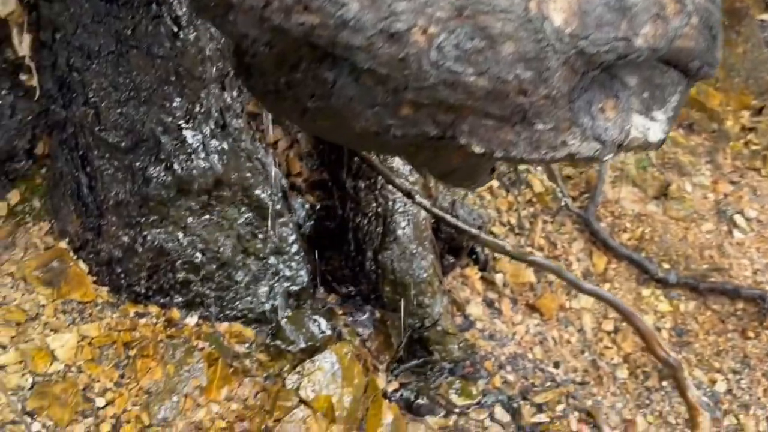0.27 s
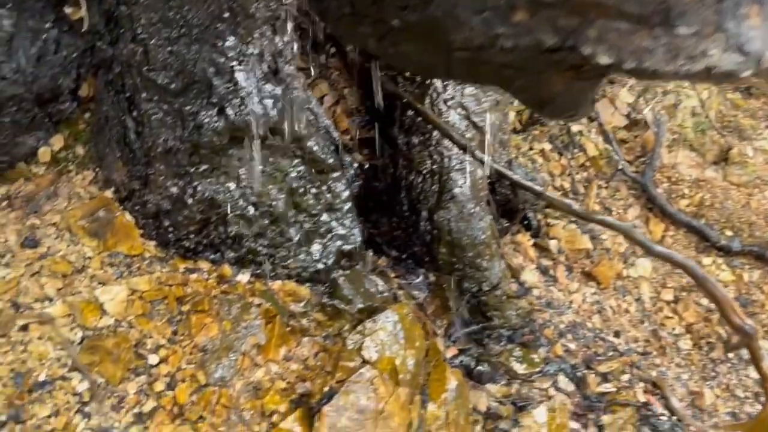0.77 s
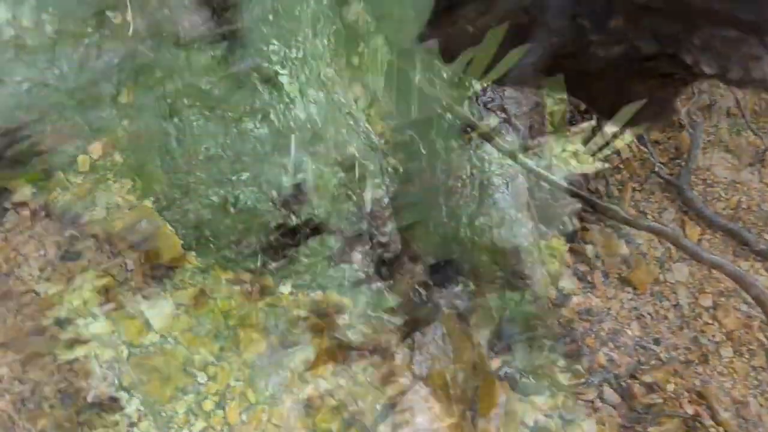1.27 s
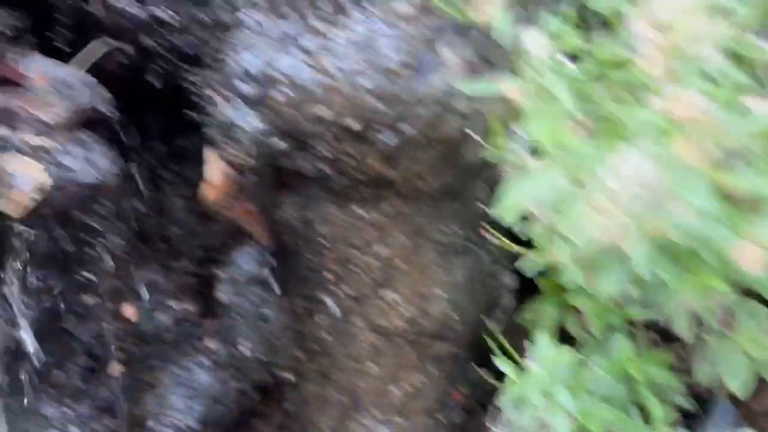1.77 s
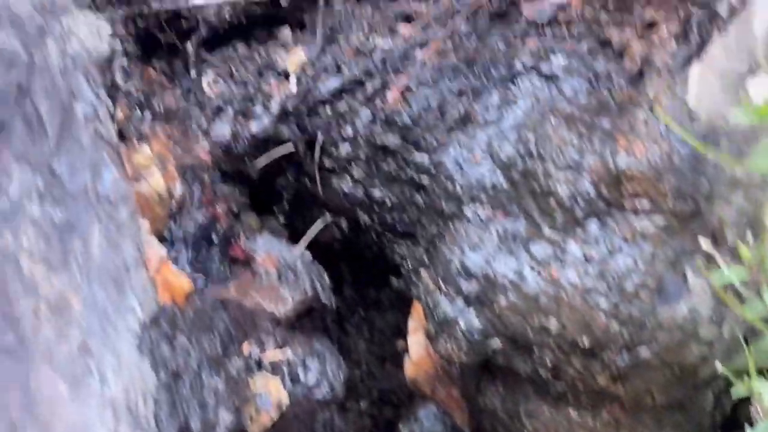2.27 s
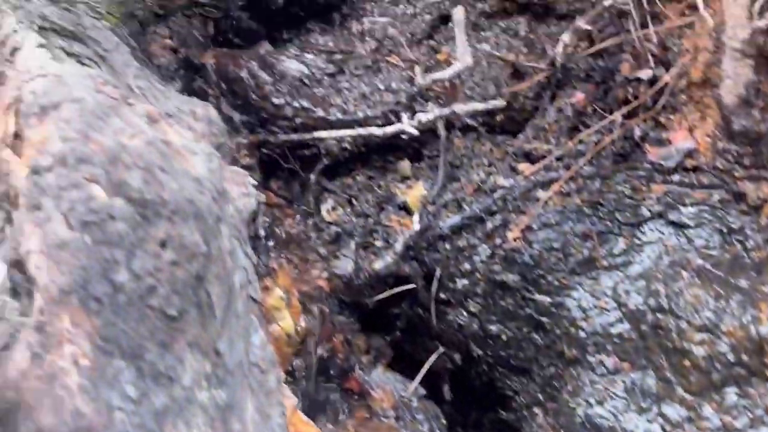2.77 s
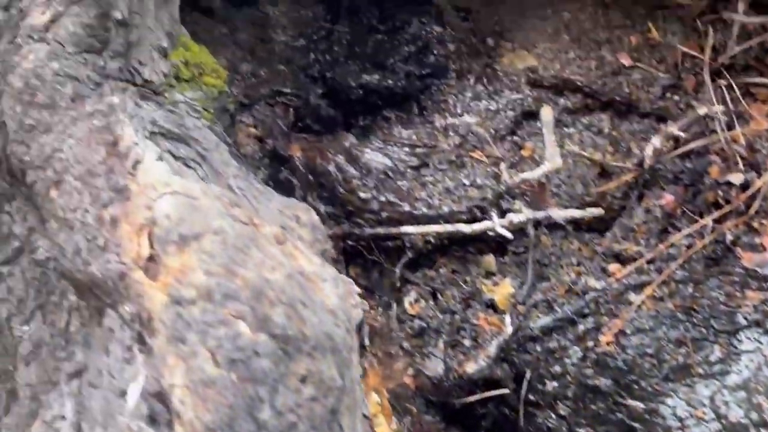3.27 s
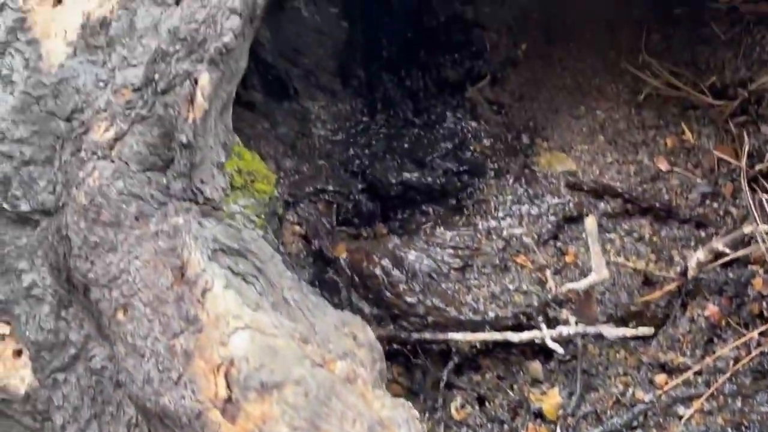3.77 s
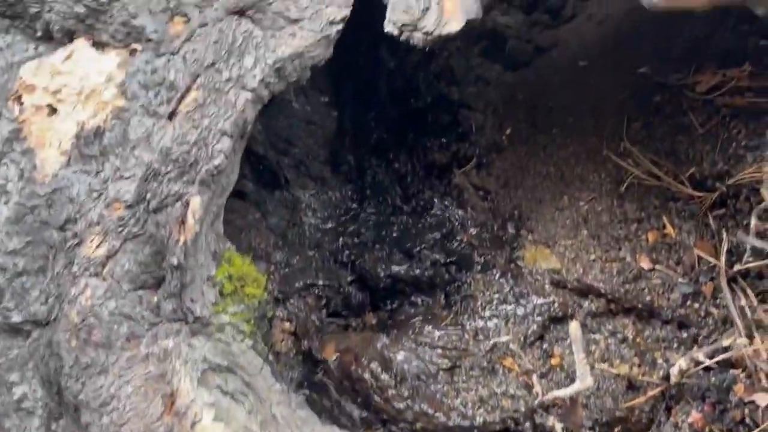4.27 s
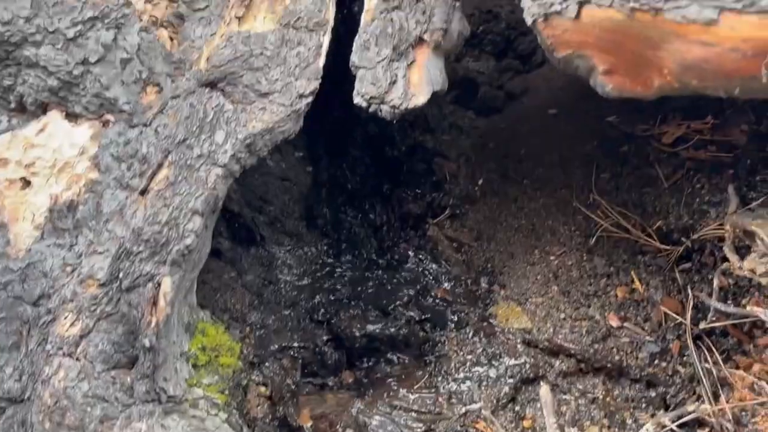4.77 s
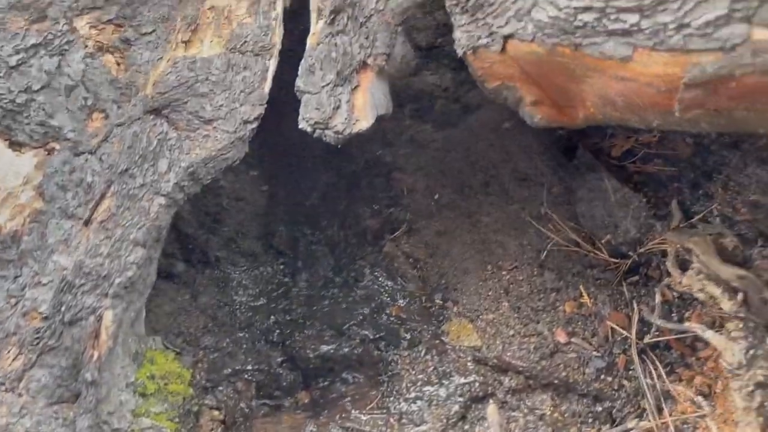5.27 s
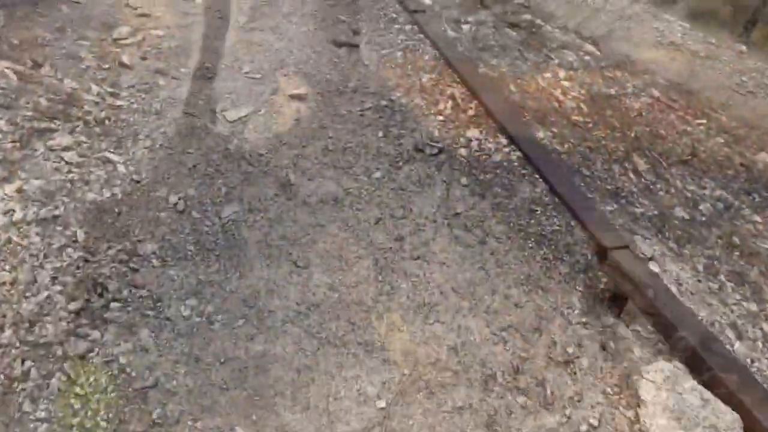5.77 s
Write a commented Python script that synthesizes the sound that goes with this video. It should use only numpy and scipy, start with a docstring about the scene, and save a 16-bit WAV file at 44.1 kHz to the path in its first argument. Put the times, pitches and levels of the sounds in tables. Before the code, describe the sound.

A thin trickle of water patters and plops irregularly on wet rock, with low breeze rumble and a few gravelly footsteps clicking.

```python
"""Trickle and drips beside a trail

A thin trickle seeps from under a boulder: a shower of tiny splats, bubbles and hiss that follows the flow.
Near drops plop as short filtered noise with a ringing bubble, or spit as treble noise on bare rock.
Boots scuff the gravel as swells of clicks and noise; heels and loose stones knock as damped resonances.
A light breeze rumbles in the hand-held microphone as lumpy low noise, and the rocks add a weak echo."""
import sys
import numpy as np
from scipy import signal
from scipy.fft import rfft, irfft
from scipy.io import wavfile

SR = 44100
rng = np.random.default_rng(int(sys.argv[2]) if len(sys.argv) > 2 else 0)


def wav_out(sig):
    """Save sig, one row per channel (or a flat mono array), as 16-bit PCM at SR to the path in sys.argv[1]."""
    wavfile.write(sys.argv[1], SR, np.round(np.clip(np.atleast_2d(sig).T, -1, 1) * 32767).astype(np.int16))


N = 265217  # samples, about 6 s

# Sounds are pairs: mid (middle) and side (left-right difference). Levels in tables and settings are
# relative: later gains shift them. t60_s is the time in which a plain fade falls by 60 dB.
HZ = np.fft.rfftfreq(N, 1 / SR)
TAPS = 4096  # length of one short sound, in samples
TAP_HZ, TAP_S = np.fft.rfftfreq(TAPS, 1 / SR), np.arange(TAPS) / SR
EDGE_HZ = 15900  # upper limit of the treble


def gain_of(db):
    """Turns decibels into amplitude."""
    return 10 ** (np.asarray(db) / 20)


def evened(x):
    """Scales a sound to an average strength (rms) of 1."""
    return x / np.sqrt(np.mean(x ** 2) + 1e-30)


def sized(sound):
    """Scales a short sound to the energy of 10 ms at rms 1."""
    return sound / np.linalg.norm(sound, axis=-1, keepdims=True) * np.sqrt(SR / 100)


def read(points, hz):
    """Joins a spectrum table by straight lines on a log-frequency axis."""
    f, value = np.transpose(points)
    return np.interp(np.log(hz + 1), np.log(f + 1), value)


def follow(curve):
    """Turns a level curve into a gain for every sample."""
    return gain_of(np.interp(np.arange(N) / SR, *np.transpose(curve)))


def coloured(x, spectrum):
    """Boosts and cuts frequencies by a spectrum table, then scales to rms 1."""
    return evened(irfft(rfft(x) * gain_of(read(spectrum, HZ)), N))


def add(mix, s, sound):
    """Adds a two-channel sound at time s, in seconds."""
    part = mix[:, max(round(s * SR), 0):][:, :sound.shape[1]]
    part += sound[:, :part.shape[1]]


def wander(per_s, size):
    """Random ups and downs of rms near 1: straight lines to a new value per_s times a second."""
    knots = rng.standard_normal(4096)
    # joining by lines weakens the swing, so 1.2 restores it
    return 1.2 * np.interp(np.arange(size) / SR * per_s, np.arange(len(knots)), knots)


def hump(f, hz, octaves):
    """Gain of a broad, heavily damped resonance around hz."""
    return (1 + (np.log2((f + 1) / hz) / octaves) ** 2 / 2) ** -1.5


def above(hz, f=TAP_HZ):
    """Gain of a gentle filter that lets through what lies above hz."""
    return 1 / np.sqrt(1 + (hz / (f + 1)) ** 4)


def ring(x, gain):
    """Filters a short sound so that it starts sharply and only rings afterwards (minimum phase)."""
    log_gain = np.log(np.maximum(gain, 1e-5))
    circle = np.concatenate([log_gain, log_gain[-2:0:-1]])
    response = np.exp(np.conj(signal.hilbert(circle)))[:len(gain)]
    return irfft(rfft(x) * response, TAPS)


def knock(hz, octaves):
    """A single click through a damped resonance."""
    return sized(ring(signal.unit_impulse(TAPS), hump(TAP_HZ, hz, octaves)))


# A full drop flattens in SLAP_S and fades in SPLASH_T60_S; a longer fade means a softer start.
SPLASH_T60_S, SLAP_S, SOFT_POWER, SOFTEST_S = 0.023, .0004, 1.6, .0014


def splat(gain, t60_s, scatter_db, lumps_per_s=500, lumps_db=4):
    """A drop flattens with a short slap of noise, then breaks up in a lumpy, fading scatter of noise."""
    t60_s = max(t60_s, 1e-3)
    flatten_s = min(SLAP_S * (t60_s / SPLASH_T60_S) ** SOFT_POWER, SOFTEST_S)
    slap, scatter = rng.standard_normal((2, 2, TAPS))
    slap = slap * TAP_S * np.exp(-TAP_S / flatten_s)
    fade = np.exp(-np.log(1000) * TAP_S / t60_s)
    onset = 1 - np.exp(-TAP_S / (2 * flatten_s))
    scatter = scatter * fade * gain_of(lumps_db * wander(lumps_per_s, TAPS)) * onset
    return sized(sized(ring(slap, gain)) + gain_of(scatter_db) * sized(ring(scatter, gain)))


def ping(hz, cycles, glide):
    """A bubble swells in about a cycle, fades by 60 dB over some cycles and rises in pitch."""
    age = TAP_S * hz / cycles
    turns = cycles * (age + glide * age ** 2)
    return np.sin(2 * np.pi * turns) * np.exp(-np.log(1000) * age) * (1 - np.exp(-turns))


def random_hits(per_s, spread_db):
    """Hits at random moments, many small and a few large."""
    size = gain_of(spread_db * np.minimum(rng.exponential(1, N), 2.5))
    return size * (rng.random(N) < per_s / SR)


def droplets(per_s, spread_db, low_hz, high_hz, octaves, t60_s, count):
    """A random shower of small splats of several pitches and many sizes."""
    out = np.zeros((2, N))
    for hz in np.geomspace(low_hz, high_hz, count):
        hits = random_hits(per_s / count, spread_db)
        drop = splat(hump(TAP_HZ, hz, octaves), t60_s, scatter_db=3.0)
        out += signal.oaconvolve(hits[None], drop, axes=1)[:, :N]
    return out


def bubbles(per_s=100, spread_db=5, low_hz=2300, high_hz=9500, cycles=36, glide=0.021, count=36):
    """A random swarm of tiny ringing bubbles of many pitches and sizes, at rms 1."""
    out = np.zeros((2, N))
    for hz in np.geomspace(low_hz, high_hz, count):
        hits = random_hits(per_s / count, spread_db)
        swarm = signal.oaconvolve(hits, ping(hz, cycles, glide) * np.sqrt(hz))[:N]
        out += np.outer([1, rng.normal()], swarm)  # each pitch has its own place left or right
    return evened(out)


# Strength of the trickle at the microphone: time_s, level_db
FLOW = [(0.0, -42.5), (.12, -47), (.17, -42.5), (0.25, -42.5), (0.37, -47.5), (0.8, -40), (1.22, -38),
        (1.52, -37.5), (2.31, -42), (2.44, -43), (3.03, -44), (3.13, -44), (3.46, -45), (3.88, -43.5),
        (4.59, -46), (5.1, -41), (5.46, -41.5), (5.72, -39.5), (5.89, -40), (6.01, -44)]
# Nearness of the little pool that throws spray and forms bubbles: time_s, level_db
POOL = [(0, 0), (4.6, 0), (5.05, -7), (6.01, -9)]
# Tone of the patter: pitch_hz, boost_db
PATTER_TONE = [(300, -39), (700, 8.5), (1200, -5.5), (1800, 0), (2250, -3.5), (2800, -1), (3500, 1.5),
               (4400, 8), (6000, 1.5), (8000, 9.5), (12500, 13), (15500, 15)]


def trickle(flow_db=-4.0, ticks_db=0.5, plips_db=-4, splashes_db=-11.0, fizz_db=-9, bubbles_db=-8,
            flutter_per_s=70, flutter_db=2.5):
    """Spray ticks, small plips, merging splashes, bubbles and a fizzing film follow the fluttering flow."""
    ticks = droplets(per_s=300, spread_db=6, low_hz=5500, high_hz=14000, octaves=.4, t60_s=.026, count=10)
    small = droplets(per_s=700, spread_db=5.5, low_hz=1120, high_hz=8200, octaves=.12, t60_s=.04, count=30)
    splashes = droplets(per_s=130, spread_db=4, low_hz=2000, high_hz=8000, octaves=.35, t60_s=.1, count=12)
    fizz = rng.standard_normal((2, N))
    film = gain_of(plips_db) * coloured(small, PATTER_TONE)
    film = film + gain_of(fizz_db) * coloured(fizz, PATTER_TONE)
    pool = gain_of(ticks_db) * coloured(ticks, PATTER_TONE)
    pool = pool + gain_of(splashes_db) * evened(splashes) + gain_of(bubbles_db) * bubbles()
    unrest_db = flutter_db * wander(flutter_per_s, N)
    return follow(FLOW) * gain_of(flow_db + unrest_db) * (film + follow(POOL) * pool)


def runnel(runnel_db=-12.5):
    """The water runs off over grit in a chatter of small, short-lived bubbles."""
    chatter = bubbles(per_s=320, spread_db=4.5, low_hz=1400, high_hz=6000, cycles=15, glide=.04, count=24)
    return gain_of(runnel_db) * follow(FLOW) * follow(POOL) * chatter


# Strength of the breeze: time_s, level_db
BREEZE = [(0, -52.5), (.55, -52.5), (.8, -46.5), (.97, -43), (1.15, -45), (1.38, -47), (1.55, -49.5),
          (1.8, -52.5), (2.2, -58.5), (2.5, -56.5), (4.05, -57.5), (4.7, -60), (5.25, -55), (5.55, -54.5),
          (5.85, -51)]
# Tone of the breeze in the microphone: pitch_hz, boost_db
WIND_TONE = [(20, -45), (33, -11), (48, -5), (64, 6), (80, 0.5), (100, -2.5), (150, -5), (215, -2.5),
             (260, -9), (330, -11), (550, -17), (1200, -17.5), (4000, -86)]
# Tone of the hillside: pitch_hz, boost_db
FOREST_TONE = [(22, -12), (50, 5), (100, -32), (350, 10), (600, -1.5), (1200, -6), (3000, -2), (8000, -25),
               (16000, -61)]


def air(wind_db=1, forest_db=-59, gusts_per_s=14, gusts_db=2.0):
    """A lumpy breeze, made of uneven noise, rumbles over the steady hush of the hillside."""
    eddies = rng.standard_normal((2, N)) * gain_of(gusts_db * wander(gusts_per_s, N))
    wind = gain_of(wind_db) * follow(BREEZE) * coloured(eddies, WIND_TONE)
    return wind + gain_of(forest_db) * coloured(rng.standard_normal((2, N)), FOREST_TONE)


# Strength of the gurgle in the cleft: time_s, level_db
CLEFT = [(1.5, -65), (2.1, -55), (3.6, -61), (4.6, -73), (5.5, -73)]


def cleft():
    """Bubbles gurgle in the hollow under the boulder, strongest as the microphone passes over it."""
    gurgle = bubbles(per_s=150, spread_db=7, low_hz=1550, high_hz=1950, cycles=36, glide=.015, count=10)
    return follow(CLEFT) * gurgle


RAGGED_OCTAVES = .5  # a plop narrower than this is a clean one


def plop(hz, octaves, t60_s, scatter_db=1.8, low_hz=800, bubble_gain=1.0, bubble_width_hz=200, detune=0.1):
    """A drop slaps a pocket of water and traps a bubble that rings briefly near the pocket's pitch."""
    bubble_hz = hz * 2 ** rng.normal(0, octaves * detune)
    clearness = min(RAGGED_OCTAVES / octaves, 1) ** 2
    bubble = 1 + bubble_gain * clearness * hump(TAP_HZ, bubble_hz, bubble_width_hz / hz)
    return splat(hump(TAP_HZ, hz, octaves) * above(low_hz) ** 4 * bubble, t60_s, scatter_db)


def spray(t60_s, low_hz=5000, scatter_db=3):
    """Spray is a splat of treble only."""
    return splat(above(low_hz) * np.where(TAP_HZ < EDGE_HZ, 1, .1), t60_s, scatter_db)


def strays(per_s=22, over_flow_db=-3, spread_db=3, low_hz=2700, high_hz=8500, octaves=0.26, t60_s=0.087,
           spray_db=-4):
    """Smaller drops fall at random from the rock's lip, stronger with the flow, each with its own pitch."""
    out, strength = np.zeros((2, N)), follow(FLOW) * follow(POOL)
    for at in np.flatnonzero(rng.random(N) < per_s / SR):
        size = strength[at] * gain_of(over_flow_db + spread_db * rng.normal())
        hz = low_hz * (high_hz / low_hz) ** rng.random()
        add(out, at / SR, size * (plop(hz, octaves, t60_s) + gain_of(spray_db) * spray(t60_s)))
    return out


# The level and pitch of a full drop, against which others are compared.
FULL_DB, FULL_HZ = -24, 3000
# The snap loses a further SNAP_GROWTH dB for each dB by which a drop is weaker than full.
SNAP_DB, SNAP_GROWTH, SNAP_OCTAVES = -6, 0.38, 0.94


def snap(db, hz):
    """The first contact of a drop is a single broad click."""
    click = sized(ring(signal.unit_impulse(TAPS), hump(TAP_HZ, hz, SNAP_OCTAVES) * above(hz=646)))
    level_db = db + SNAP_DB + SNAP_GROWTH * min(db - FULL_DB, 0)
    return gain_of(level_db) * np.outer([1, rng.normal(0, 0.94)], click)


# A weak drop dribbles on, twice as long for every DRIBBLE_DB less; high or clean ones end sooner.
DRIBBLE_DB, PITCH_POWER, CLEAN_POWER = 14.5, .22, .4
# The thread of water that arrives just ahead of a drop.
LEAD_S, LEAD_HZ, LEAD_T60_S = .005, 4360, 0.07
DEEP_SPRAY_DB = -2  # spray change for each octave a pocket lies below FULL_HZ
# Near drops landing in pockets of water: start_s, level_db (over 10 ms), pitch_hz, width_octaves
DROPS = [(0.1509, -36, 1650, 1.35), (0.1857, -34.5, 2180, 2.4), (0.224, -38, 2650, 0.26),
         (0.2551, -33, 8100, 0.22), (.341, -40, 5140, 0.32), (0.3709, -29.5, 2830, 0.55),
         (.3777, -33, 2240, 0.53), (.387, -37, 2800, 1.1), (.394, -45, 2500, 1.2),
         (0.4295, -30, 1850, 0.93), (0.5327, -27, 4050, 0.84), (.564, -34.5, 4500, 0.093),
         (.581, -37.5, 6760, 0.29), (0.611, -29, 7360, 0.36), (0.658, -34.5, 7140, 1.5),
         (0.719, -36, 2940, 0.57), (0.7346, -33.5, 4750, 0.36), (0.7945, -29.5, 2780, 0.67),
         (.816, -35, 3320, 1.2), (0.8947, -35, 2620, 0.66), (1.033, -39, 3420, .25),
         (1.101, -41, 2450, 0.34), (1.1228, -36, 2360, 1.5), (1.1474, -34, 2460, 0.38),
         (1.2399, -36, 1000, 0.76), (1.251, -38, 2680, 0.9), (1.303, -35, 7060, 0.18),
         (1.333, -36.5, 4100, 0.47), (1.352, -38, 1510, 0.49), (1.4715, -48, 3460, .4),
         (1.512, -33, 3500, 0.94), (1.537, -35, 6100, 0.37), (1.596, -36, 4200, 0.49),
         (1.6293, -27.5, 8950, 0.36), (1.6835, -35.5, 5960, 0.71), (1.7111, -26.5, 5300, 1.9),
         (1.72, -23, 4060, 0.22), (1.7274, -34, 4300, 0.41), (1.7659, -33, 8600, .15),
         (1.8159, -26, 5500, 0.57), (1.862, -31, 3970, 0.45), (1.972, -35.5, 4270, 3.3),
         (1.996, -35.5, 4270, 0.75), (2.047, -37.5, 4700, 0.62), (2.0883, -34.5, 4600, 0.27),
         (2.0883, -31, 1660, 0.51), (2.14, -33.5, 4460, 0.44), (2.1444, -32.5, 1270, 0.43),
         (2.152, -44, 4170, 0.13), (2.173, -38.5, 4170, 0.24), (2.2837, -34.5, 2860, 1.3),
         (2.3375, -36.5, 5100, 0.8), (2.417, -26.5, 3720, 0.74), (2.486, -37.5, 3980, 0.46),
         (2.514, -34.5, 6650, 0.66), (2.6235, -34, 1210, 0.5), (2.649, -39, 3900, 0.47),
         (2.672, -38, 1750, 0.17), (2.686, -35, 1550, 0.72), (2.6918, -30.5, 4140, 0.11),
         (2.715, -36.5, 3960, 0.27), (2.7842, -43, 2300, 1.1), (2.815, -37.5, 1890, 1.2),
         (2.932, -34, 5760, 2), (3.055, -30.5, 3800, 1.7), (3.062, -38.5, 1310, 0.51),
         (3.078, -41, 7580, 0.38), (3.089, -37, 3750, 0.34), (3.146, -30, 3450, 1.5),
         (3.176, -41.5, 2900, 0.2), (3.2057, -36.5, 3760, 0.29), (3.213, -42.5, 1670, 0.17),
         (3.272, -35, 7840, 0.1), (3.3581, -35.5, 3800, 0.82), (3.4467, -25, 2500, 0.7),
         (3.4613, -38.5, 3070, 1.1), (3.5377, -41.5, 1680, 0.2), (3.7134, -36.5, 3770, 0.58),
         (3.7491, -34.5, 3240, 0.38), (3.8162, -33, 1850, 0.79), (3.934, -33, 4230, 0.39),
         (3.9915, -38, 2640, 0.13), (4.0846, -38, 3030, 0.79), (4.131, -48, 1300, .4),
         (4.147, -49.5, 1250, 0.68), (4.2053, -35, 4750, 0.83), (4.2806, -33, 3560, 1),
         (4.322, -39, 7200, 0.37), (4.356, -38.5, 2700, 0.54), (4.3743, -31.5, 3630, 0.93),
         (4.486, -43, 3140, 0.37), (4.598, -43, 4500, 1.3), (4.6871, -33, 2700, 0.73),
         (4.753, -37, 4220, 0.4), (4.848, -39, 2840, 0.31), (4.9046, -34, 4500, 0.21),
         (4.9814, -27, 1840, 0.61), (5.2902, -31.5, 4700, 0.088), (5.4624, -34, 3370, 0.95),
         (5.476, -33, 3140, 0.91)]


def drips(plop_db=-0.4, spray_db=-13, spray_lag_s=0.0014, lead_db=-14):
    """A thread of water runs ahead of each near drop, which snaps, plops and throws spray."""
    out = np.zeros((2, N))
    for s, db, hz, octaves in DROPS:
        t60_s = SPLASH_T60_S * 2 ** ((FULL_DB - db) / DRIBBLE_DB) * (FULL_HZ / hz) ** PITCH_POWER
        t60_s *= min(octaves / RAGGED_OCTAVES, 1) ** CLEAN_POWER
        thread = splat(hump(TAP_HZ, LEAD_HZ, 1.0) * above(hz=1190), LEAD_T60_S, scatter_db=19)
        deep_db = DEEP_SPRAY_DB * max(np.log2(FULL_HZ / hz), 0)
        add(out, s - LEAD_S, gain_of(db + lead_db) * thread)
        add(out, s + SLAP_S, snap(db, hz))
        add(out, s, gain_of(db + plop_db) * plop(hz, octaves, t60_s))
        add(out, s + spray_lag_s, gain_of(db + spray_db + deep_db) * spray(t60_s))
    return out


SPIT_T60_S = 0.034
# Drops that burst into bright spray on bare rock: start_s, level_db (over 10 ms)
SPITS = [(0.168, -35), (.302, -39), (0.5318, -42), (.6122, -35), (0.626, -34.5), (.682, -31), (0.896, -40),
         (0.9354, -38), (1.018, -33.5), (1.126, -33.5), (1.148, -33.5), (1.159, -36.5), (1.231, -31.5),
         (1.345, -31), (1.39, -32.5), (1.4274, -29), (1.5196, -32.5), (1.598, -33), (1.7122, -45),
         (1.871, -36.5), (2.127, -34.5), (2.173, -42), (2.307, -34), (2.65, -38.5), (2.7844, -35.5),
         (3.178, -35.5), (3.257, -40), (3.532, -38), (3.6317, -30), (3.739, -41), (3.7484, -31.5),
         (4.1654, -39.5), (4.281, -36.5), (4.902, -40.5), (5.142, -38.5), (5.202, -41.5), (5.862, -36)]


def spits(spit_db=0, scatter_db=-1):
    """Drops on bare rock trap no air: they only burst into spray."""
    out = np.zeros((2, N))
    for s, db in SPITS:
        add(out, s, gain_of(db + spit_db) * spray(SPIT_T60_S, scatter_db=scatter_db))
    return out


# A bubble rings longer the lower it is; PLIP_T60_S holds at FULL_HZ.
PLIP_T60_S, PLIP_POWER, PLIP_GLIDE = 0.021, 0.17, 0.018
# Bubbles trapped by near drops, ringing clearly: start_s, level_db (over 10 ms), pitch_hz
PLIPS = [(.3785, -39, 2080), (.4288, -28, 1890), (.5335, -32, 4620), (0.5325, -35, 6870), (.736, -37, 4160),
         (.736, -37, 5200), (0.7942, -28, 2900), (.7955, -38, 4530), (0.898, -41, 2600),
         (.935, -39.5, 6540), (1.121, -38.5, 2520), (1.348, -34, 4560), (1.416, -37, 2090),
         (1.8165, -30, 7580), (2.09, -32.5, 1490), (2.1444, -32, 1055), (2.173, -37.5, 1650),
         (2.43, -39, 2880), (2.76, -44.5, 7340), (2.886, -53, 4400), (3.935, -41, 3500), (5.477, -37, 3390)]


def plips(plip_db=0, side=.8):
    """The larger bubbles each ring with one short, round note, to the left or right at random."""
    out = np.zeros((2, N))
    for s, db, hz in PLIPS:
        t60_s = PLIP_T60_S * (FULL_HZ / hz) ** PLIP_POWER
        note = sized(ping(hz, hz * t60_s, PLIP_GLIDE))
        add(out, s, gain_of(db + plip_db) * np.outer([1, side * rng.choice([-1, 1])], note))
    return out


CLACK_T60_S, RATTLE_DB = .02, -4  # the rattle that goes with a clack, and its level against it
# Loose stones knocked together: start_s, level_db (over 10 ms), pitch_hz, width_octaves
STONES = [(1.1595, -42, 1300, 0.54), (1.1622, -33.5, 850, 0.52), (1.1655, -35, 770, 0.35),
          (1.394, -49, 1300, .6), (1.409, -38, 720, 0.58), (1.4135, -40, 646, 0.23),
          (1.4215, -42, 1110, 0.72), (1.429, -32.5, 900, 0.66), (5.036, -38.5, 1900, 1.6),
          (5.044, -41.5, 724, 0.27), (5.0895, -50, 1450, 0.64), (5.1105, -43, 1900, .5),
          (5.117, -38.5, 1780, 0.57), (5.1446, -27, 1140, 0.45), (5.1495, -30, 770, 0.31),
          (5.163, -35, 880, 0.8), (5.169, -42, 1300, .8), (5.617, -40, 564, .4), (5.637, -43, 1060, .5),
          (5.674, -39.5, 1300, 1.2), (5.688, -42, 1010, 0.84), (5.701, -37.5, 1490, 0.48),
          (5.718, -42, 1500, 0.63), (5.821, -44, 750, 0.74), (5.86, -47, 790, 0.37), (5.878, -45, 1700, .3),
          (5.903, -44, 1000, 0.16), (5.905, -49, 1600, 0.16), (5.939, -43.5, 1650, 0.099),
          (5.968, -41.5, 736, 0.38)]


def stones():
    """Loose stones clack sharply, as a damped resonance, with a weaker rattle that dies quickly."""
    out = np.zeros((2, N))
    for s, db, hz, octaves in STONES:
        clack = np.outer([1, rng.normal()], knock(hz, octaves))
        rattle = splat(hump(TAP_HZ, hz, octaves), CLACK_T60_S, scatter_db=8.5)
        add(out, s, gain_of(db) * (clack + gain_of(RATTLE_DB) * rattle))
    return out


PRESS_POWER = 1.38  # above 1, the press of a foot is rounded at its top


def crunch(gravel, rise_s, fall_s, hz, octaves, low_hz=0, size=65536):
    """A swell of gravel noise around one pitch, peaking near rms 1 in its middle."""
    t, f = (np.arange(size) - size // 2) / SR, np.fft.rfftfreq(size, 1 / SR)
    patch = gravel[:, rng.integers(N - size):][:, :size]
    reach_s = np.maximum(np.where(t < 0, rise_s, fall_s), 1e-4)
    press = np.exp(-(abs(t) / reach_s) ** PRESS_POWER)
    sound = press * irfft(rfft(patch) * hump(f, hz, octaves) * above(low_hz, f) ** 2)
    return sound * np.linalg.norm(press) / np.linalg.norm(sound, axis=1, keepdims=True)


# Levels of the settling gravel, ground grit and drumming sole are against the step.
SETTLE_DB, SETTLE_RATIO = -8.5, 5.4  # settling lasts this many times the rise of the press
GRIT_DB, GRIT_HZ, GRIT_OCTAVES = -6, 2400, 0.63
SOLE_DB, SOLE_HZ, SOLE_OCTAVES = -5.5, 724, 0.31
STEP_LOW_HZ = 372
# The ground booms under each heel.
BOOM_HZ, BOOM_OCTAVES, BOOM_LAG_S, BOOM_RISE_S, BOOM_FALL_S = 79, 0.5, 0.011, 0.0039, 0.12
# Soles pressing the gravel: peak_s, rise_s, fall_s, peak_db, pitch_hz (centre), width_octaves
STEPS = [(1.421, 0.011, 0.011, -30, 2200, 2.4), (5.041, 0.004, 0.031, -37.5, 895, 2.4),
         (5.146, 0.069, 0.016, -36.5, 1170, 0.87), (5.7, 0.088, 0.025, -37, 970, 1.1),
         (5.795, 0.045, 0.023, -45, 1500, 0.86)]
# Heels landing: start_s, knock_db (over 10 ms), pitch_hz (knock), boom_db (peak)
HEELS = [(1.433, -34, 320, -43.5), (5.147, -42, 205, -58), (5.597, -31, 318, -39), (5.827, -47, 109, -46)]


def boots(grains_per_s=900, spread_db=2.0, scrape_db=-12, settle_hz=1110, settle_octaves=1.38):
    """Soles press clicking pebbles, grind grit and drum, the gravel settles, and the ground booms."""
    pebbles = droplets(per_s=grains_per_s, spread_db=spread_db, low_hz=266, high_hz=7700,
                       octaves=0.64, t60_s=0.0046, count=18)
    pebbles = evened(irfft(rfft(pebbles) * np.sqrt(HZ), N))  # small stones outnumber the large
    gravel = pebbles + gain_of(scrape_db) * rng.standard_normal((2, N))
    sounds = []
    for s, rise_s, fall_s, db, hz, octaves in STEPS:
        settle_s = SETTLE_RATIO * rise_s
        sounds.append((s, db, crunch(gravel, rise_s, fall_s, hz, octaves, STEP_LOW_HZ)))
        sounds.append((s, db + GRIT_DB, crunch(pebbles, rise_s, fall_s, GRIT_HZ, GRIT_OCTAVES)))
        sounds.append((s, db + SOLE_DB, crunch(gravel, rise_s, fall_s, SOLE_HZ, SOLE_OCTAVES)))
        sounds.append((s, db + SETTLE_DB, crunch(gravel, rise_s, settle_s, settle_hz, settle_octaves)))
    for s, _, _, db in HEELS:
        boom = crunch(gravel, BOOM_RISE_S, BOOM_FALL_S, BOOM_HZ, BOOM_OCTAVES)
        sounds.append((s + BOOM_LAG_S, db, boom))
    out = np.zeros((2, N))
    for s, db, sound in sounds:
        add(out, s - sound.shape[1] / 2 / SR, gain_of(db) * sound)  # the peak lies in the middle
    return out


KNOCK_OCTAVES = 0.45
BOUNCE_S, BOUNCE_DB = .0045, -3  # delay and level of the bounce against the first knock


def heels():
    """A heel lands with a dull, quickly damped push and bounces once."""
    out = np.zeros((2, N))
    for s, db, hz, _ in HEELS:
        thud = np.outer([1, .5], knock(hz, KNOCK_OCTAVES))
        add(out, s, gain_of(db) * thud)
        add(out, s + BOUNCE_S, gain_of(db + BOUNCE_DB) * thud)
    return out


def rocks(x, t60_s=0.082, gap_s=0.002):
    """The boulders around return a short echo: the mid sound smeared by fading noise."""
    t = np.arange(SR // 4) / SR
    tail = rng.standard_normal((2, len(t))) * np.exp(-np.log(1000) * t / t60_s) * (t > gap_s)
    return signal.oaconvolve(x[:1], tail / np.linalg.norm(tail[0]), axes=1)[:, :N]


# Stereo width: pitch_hz, side_db (gain of the side signal)
WIDTH = [(60, -8.5), (500, -8.5), (1000, -9), (2000, -5.5), (2900, -7.5), (4500, -7.5), (5600, -3.5),
         (7100, -14), (8600, -8), (10100, -19), (11500, -6.5), (12850, -19), (14100, -6), (15500, -19)]
# Phase between left and right: pitch_hz, lead_rad (by which left leads right)
STEREO_PHASE = [(0, 0), (2200, -.2), (2800, .8), (4600, .3), (5800, -.3), (7100, 0), (8000, -.8),
                (9400, -2.8), (10700, -3.5), (12000, -6), (13500, -6.5), (14600, -8.9), (15500, -9.42)]


def scene(echo_db=-14):
    """Mixes all sources and the echo into stereo, with the treble turned in phase between left and right."""
    water = trickle() + runnel() + cleft() + strays() + drips() + spits() + plips()
    near = water + stones() + boots() + heels()
    mid, side = rfft(near + gain_of(echo_db) * rocks(near) + air())
    side = side * gain_of(read(WIDTH, HZ))
    # each channel takes half of the phase lead
    turn = np.exp(.5j * np.interp(HZ, *np.transpose(STEREO_PHASE)))
    return irfft(np.array([(mid + side) * turn, (mid - side) / turn]), N)


def record(dry, level_db=-1.18):
    """Sets the overall level and cuts the treble above EDGE_HZ."""
    edge = signal.firwin(511, EDGE_HZ, window=("kaiser", 9), fs=SR)
    return gain_of(level_db) * signal.oaconvolve(dry, edge[None], "same")


dry = scene()
out = record(dry)
wav_out(out)
```